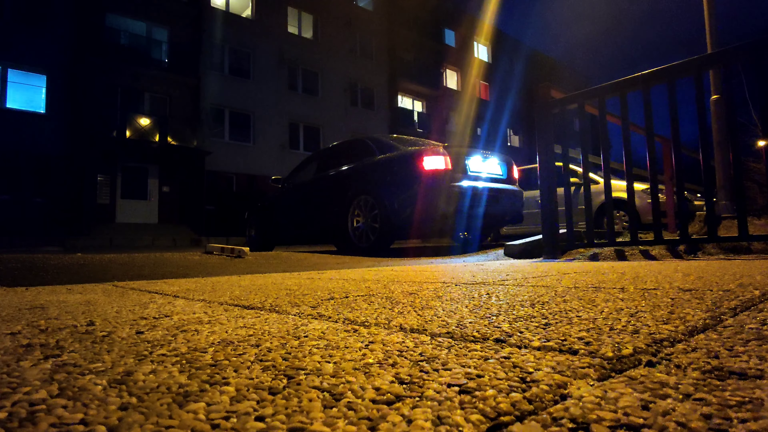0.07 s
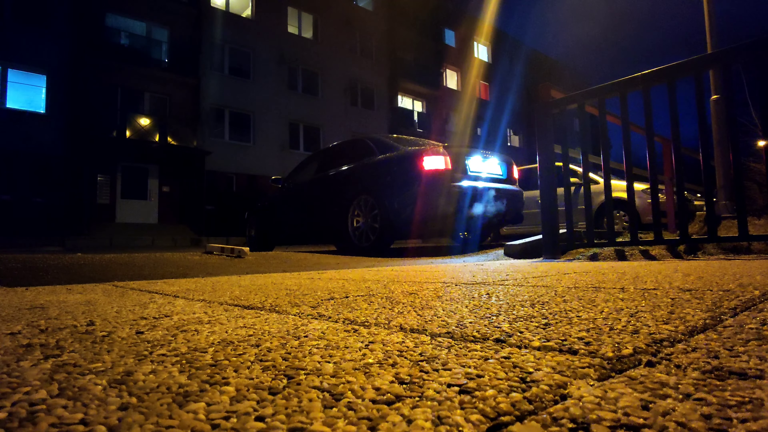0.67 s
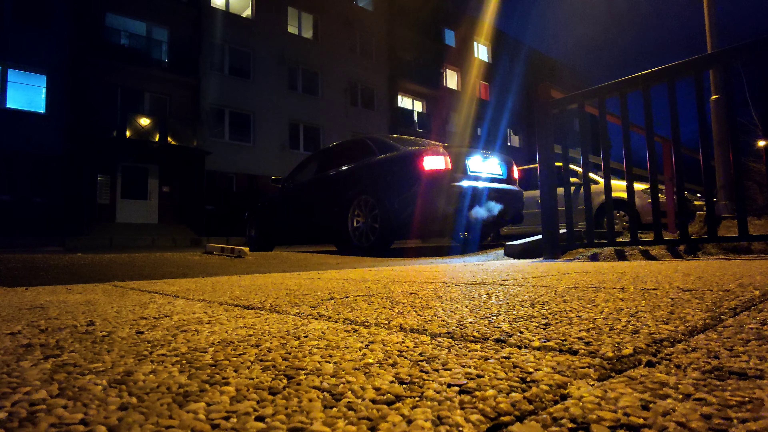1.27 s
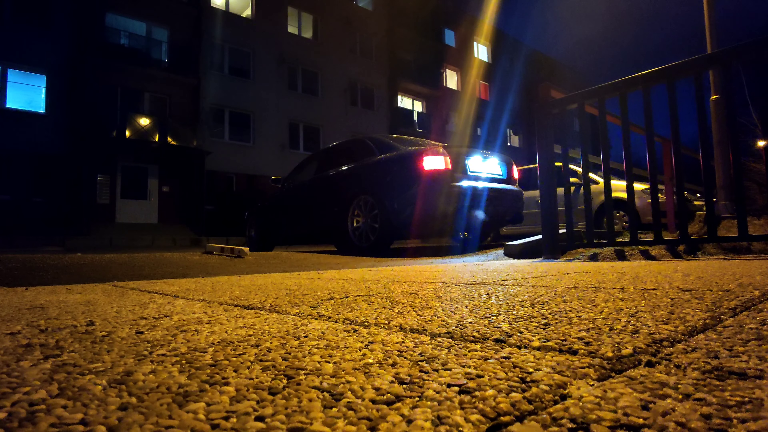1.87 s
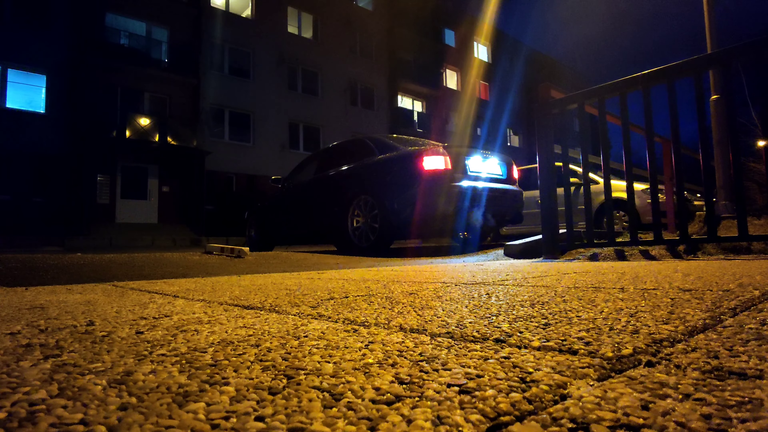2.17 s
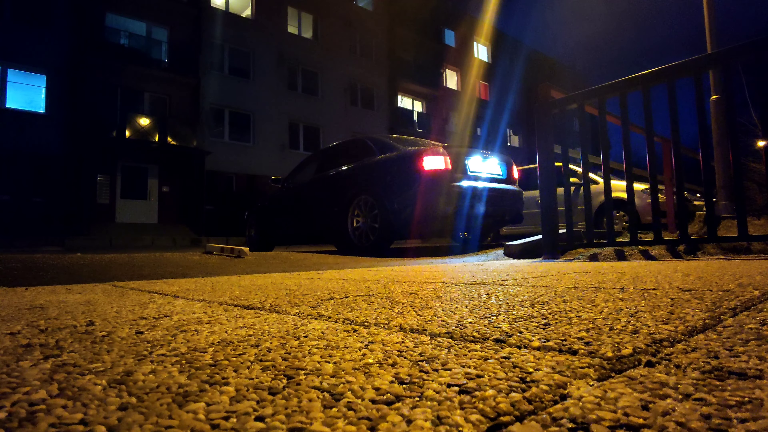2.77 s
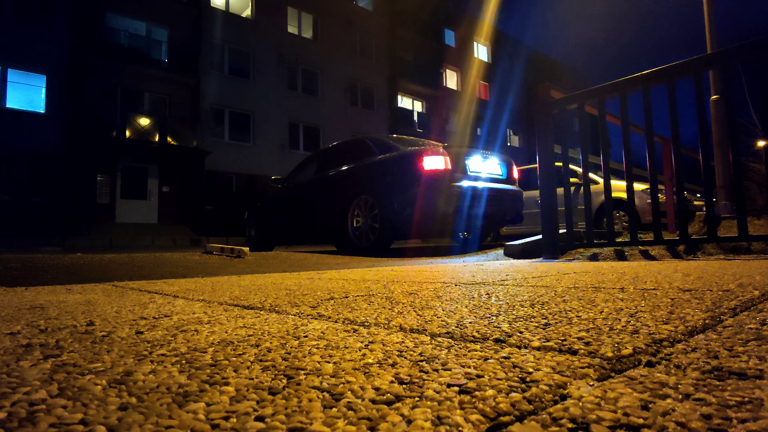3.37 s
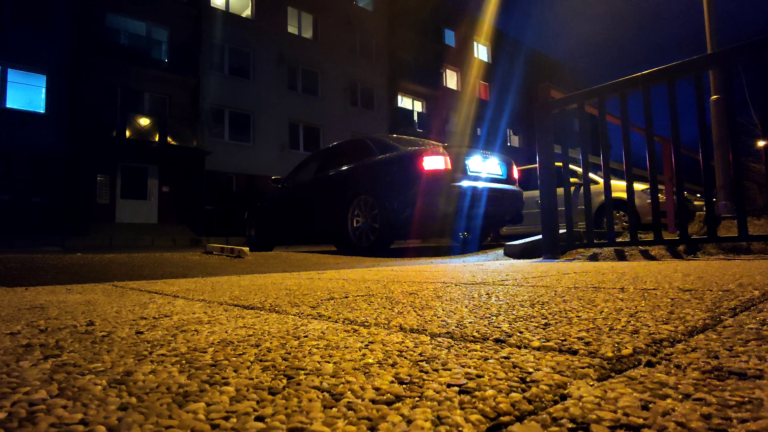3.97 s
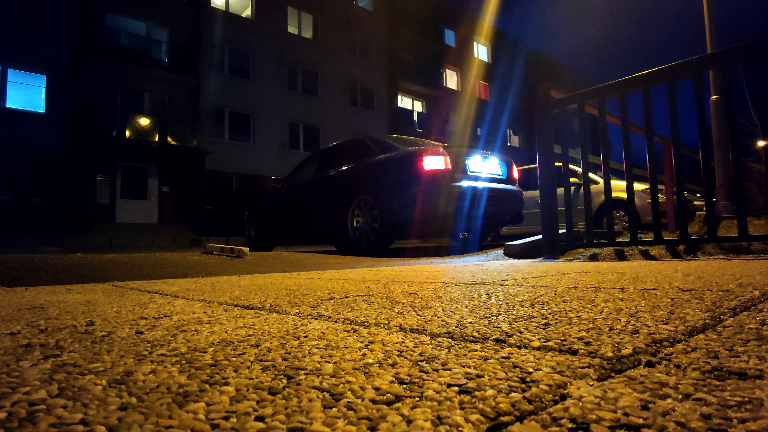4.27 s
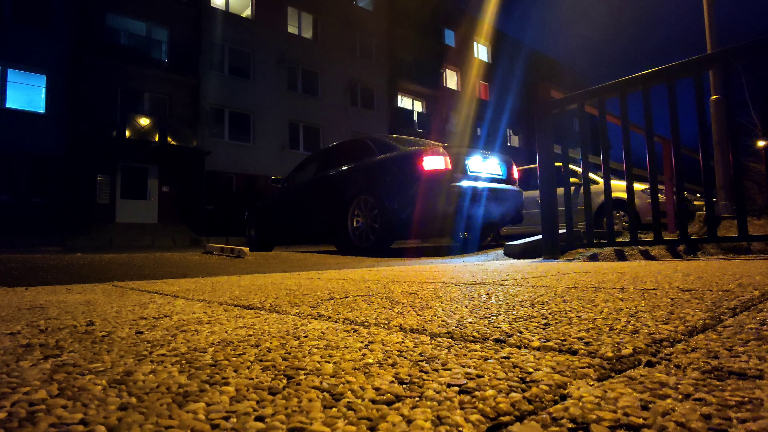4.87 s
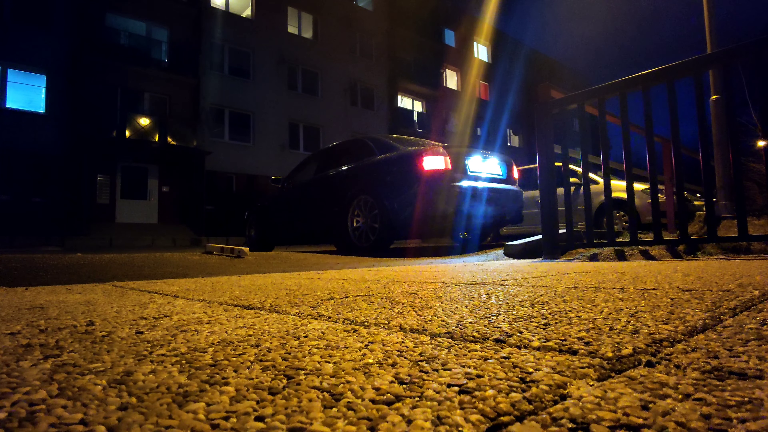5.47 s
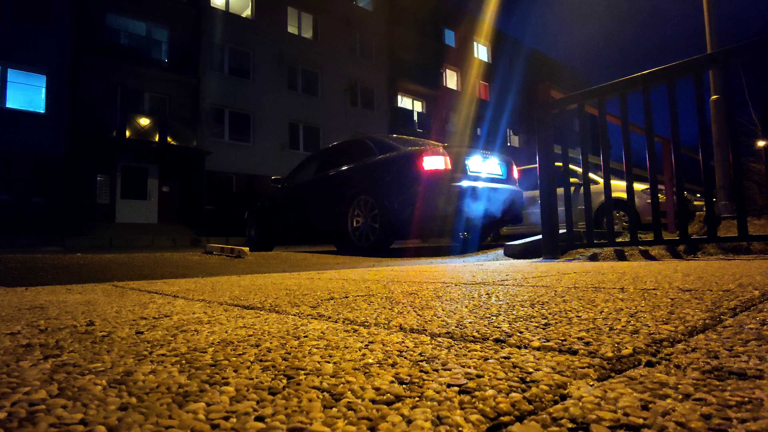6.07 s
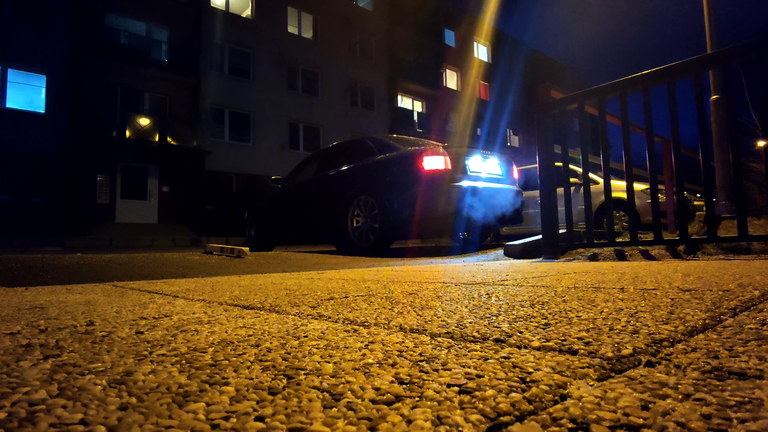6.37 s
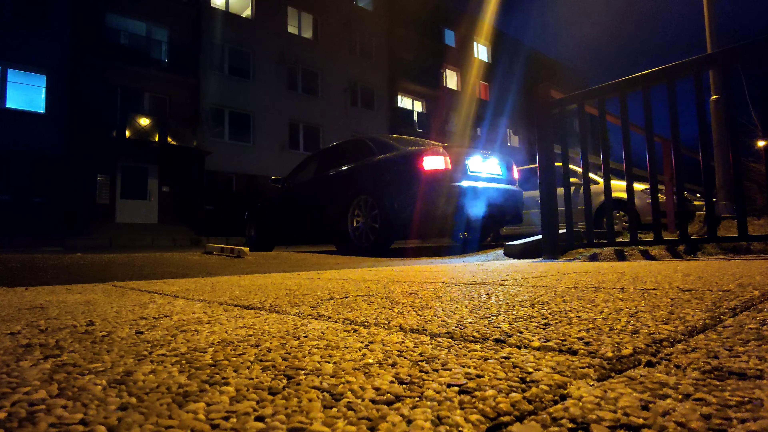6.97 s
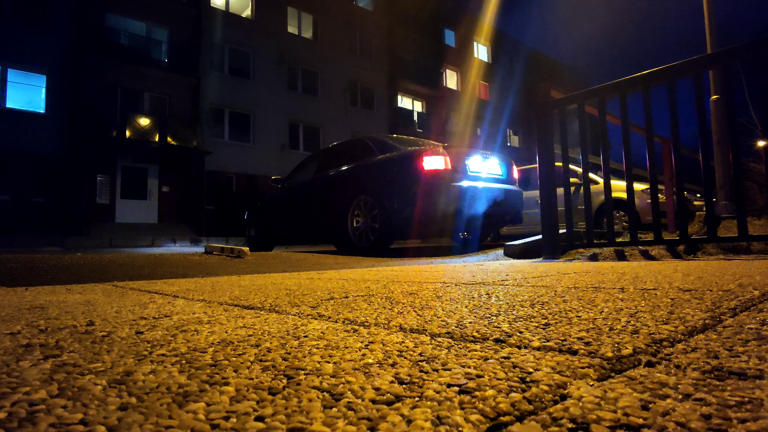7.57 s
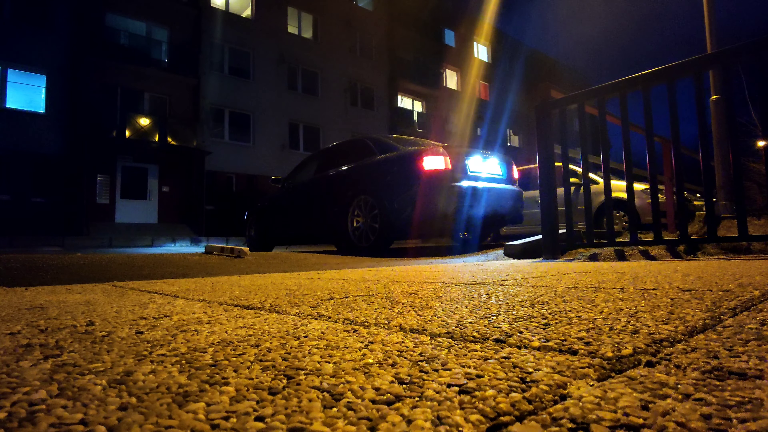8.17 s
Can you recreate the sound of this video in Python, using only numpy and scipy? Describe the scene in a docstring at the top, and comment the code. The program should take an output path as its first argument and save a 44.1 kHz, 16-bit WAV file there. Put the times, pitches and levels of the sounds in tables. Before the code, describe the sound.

Outdoors between buildings, a car engine chugs at a steady idle, with soft ticking and one faint, brief belt squeak early on. Then come two quick, loud revs that rasp through the sports exhaust, each trailed by crackling pops and sharp bangs echoing off the walls. The engine winds down to idle again. Light gusts of air rumble on the microphone.

```python
"""A six-cylinder car with a sports exhaust idles between apartment blocks at night. Each firing sends
a pressure pulse and gas noise down the pipe; house fronts echo, valves tick, air buffets the microphones.
Near 0.9 s the belt squeaks faintly. At 4.4 s and 5.6 s the engine is revved and the pipe barks and rasps.
As the throttle shuts, firing turns uneven and late-burning fuel pops in the silencer and bangs in the
pipe. From about 7 s the engine settles back to idle."""
import sys
import numpy as np
from scipy import signal
from scipy.fft import rfft, irfft
from scipy.io import wavfile
from scipy.ndimage import uniform_filter1d

SR = 44100
rng = np.random.default_rng(int(sys.argv[2]) if len(sys.argv) > 2 else 0)


def unload_wav(signal):
    """Save mono or channel-first audio to the path in sys.argv[1] as 16-bit WAV at rate SR, clipped to [-1, 1]."""
    wavfile.write(
        sys.argv[1],
        SR,
        np.round(np.clip(np.atleast_2d(signal).T, -1, 1) * 32767).astype(np.int16),
    )


N = 362943
TIME = np.arange(N) / SR
IDLE_HZ = 60  # firings a second


# (time [s], firing rate [Hz])
FIRING_RATE = [(0, 83), (.3, 74), (.55, 66), (.9, 60.7), (1.4, 59.9), (3, 60.8), (4.32, 59.7), (4.45, 72),
               (4.52, 94), (4.61, 118), (4.72, 145), (4.81, 153), (4.98, 138), (5.12, 122), (5.6, 77),
               (5.68, 96), (5.78, 128), (5.85, 158), (5.92, 183), (6.02, 199.5), (6.12, 189), (6.3, 165),
               (6.58, 129), (7.2, 80), (7.75, 63), (8.23, 57.8)]

def crankshaft(start_cycles=-.47):
    """Firing rate and its slightly wandering phase, one cycle per firing."""
    rate_hz, = curve(FIRING_RATE)
    return rate_hz, start_cycles + np.cumsum(rate_hz) / SR + .007 * wander(2)


# (opens [s], ramp [s], starts to shut [s])
THROTTLE_PRESSES = [(4.42, 0.18, 4.69), (5.615, 0.135, 5.835), (5.8, 0.115, 6.03)]

def throttle(manifold_s=.12):
    """Opening, 0-1: ramp, hold, then decay as the manifold empties."""
    presses = [np.clip((TIME - opens) / ramp, 0, 1) * np.exp(-np.maximum(TIME - shuts, 0) / manifold_s)
               for opens, ramp, shuts in THROTTLE_PRESSES]
    return np.max(presses, 0)


# Fuel cuts in (-) or starves (+): (time [s], half length [s], starvation change [ratio])
FUEL_SPELLS = [(5.051, 0.017, -0.54), (6.653, 0.063, -0.94), (7.202, 0.16, 0.83)]

def starvation(rate_hz, coast_span_hz=7.1):
    """Lack of fuel: about 1 while the engine coasts down from above idle."""
    slowing = uniform_filter1d(1. * (np.gradient(rate_hz) <= 0), size=4400)
    above_idle = np.clip((rate_hz - IDLE_HZ) / coast_span_hz, 0, 1)
    spells = sum(change * np.exp(-((TIME - s) / half) ** 4) for s, half, change in FUEL_SPELLS)
    return np.maximum(slowing * above_idle ** 2 + spells, 0)


def misfiring(rate_hz, starved, opening, idle=.06, loaded=.057, coasting=.64, rough_hz=102):
    """Share of uneven combustion, 0-1: raw, and evened out below rough_hz."""
    off_load = idle + (coasting - idle) * np.minimum(starved, 1)
    misfire = off_load * (1 - opening) + loaded * opening
    return misfire, np.maximum(misfire * np.minimum(rate_hz / rough_hz, 1) ** 2, idle)


# In firing order: (idle body [dB], idle throat [dB], load strength [dB], lag [cycles], valve tick [dB])
CYLINDERS = [(-10, -3, 2.5, .03, -19), (2.5, -8, -3.5, .02, 0), (2.5, 5.5, .5, .03, -20.5),
             (1.5, 2, -3, .005, -.5), (-3.5, -2.5, 1, .03, -6.5), (1, .5, -1, .02, -5)]

def firings(cycles, rate_hz, load, uneven, scatter_db=5, jitter_cycles=.17, bank_lag_cycles=.05):
    """Body, throat and valve impulses. Unequal cylinders chug at idle; at speed one bank lags."""
    at = np.flatnonzero(np.diff(np.floor(np.maximum(cycles, 0)))) + 1
    count = np.arange(len(at))
    body_db, throat_db, load_db, idle_lag, tick_db = np.array(CYLINDERS)[count % len(CYLINDERS)].T
    strength, slip, knock = np.clip(rng.standard_normal((len(at), 3)), -2, 2).T
    working = np.clip(np.maximum(load[at], rate_hz[at] / IDLE_HZ - 1), 0, 1)
    lag = (1 - working) * idle_lag + working * bank_lag_cycles * (count % 2)
    times_s = TIME[at] + (lag + jitter_cycles * slip * uneven[at] ** 1.5) / rate_hz[at]
    shared_db = load_db * working + scatter_db * strength * uneven[at]
    body, throat = [clicks(times_s, amp(db * (1 - working) + shared_db)) for db in (body_db, throat_db)]
    return body, throat, clicks(TIME[at], amp(tick_db + 2 * knock))


# (frequency [Hz], gain [dB])
LOAD_PULSE_SPECTRUM = [(40, -25.5), (75, -12.5), (115, 6.5), (200, 4.5), (260, -2), (315, 6.5), (388, 5),
                       (445, 4), (520, 9), (620, 8), (700, 0.5), (790, -9), (950, -8), (1250, -18.5),
                       (2500, -26), (7000, -62)]
# Standing waves: (frequency [Hz], t60 [s], gain [dB])
PIPE_MODES = [(81, .25, 4), (135, .12, 2), (182, .25, 1), (331, .45, 1), (587, .25, -5), (873, .25, 5)]
# Blare of the pipe mouth: (frequency [Hz], t60 [s], gain [dB])
MOUTH_MODES = [(700, .022, 8), (790, .02, 4), (885, .03, 2)]

def bark(pulses, soft, load, blare, bark_db, trim_db=2.4, flow_damping=.12):
    """Exhaust pulses turn hard and turbulent under load; fast flow damps the standing waves."""
    gas = steadied(pulses[None], size=8001)
    eddies = .28 * steadied(convolve(pulses, np.exp(-TIME[:1000] / .002))) * rng.standard_normal(N)
    hard = silencer(convolve(gas + eddies, response(LOAD_PULSE_SPECTRUM)), hold_hz=587, width_hz=550)
    sound = (1 - load) * soft + load * hard + ring(hard * blare, MOUTH_MODES)
    sound = yard(sound + ring(sound * (1 - flow_damping * load), PIPE_MODES), wall_db=-13, tail_db=-17)
    mids = signal.sosfilt(signal.butter(2, [280, 1000], "band", fs=SR, output="sos"), sound)
    mid_power = uniform_filter1d(uniform_filter1d((mids ** 2).mean(0), size=4400), size=2000)
    return amp(bark_db + trim_db) * sound / np.sqrt(abs(mid_power) + 1e-12)


# (time [s], half length [s], level change [dB])
BARK_SURGES = [(4.72, 0.027, -2), (4.945, 0.022, -5.5), (5.585, 0.017, -1.5), (5.665, 0.013, -5.5),
               (5.96, 0.026, 3), (6.095, 0.032, 3.5), (6.145, 0.062, 0), (6.335, 0.024, -9.5),
               (6.5, 0.028, -2), (6.62, 0.09, -6), (6.735, .02, -6)]

def bark_level(rate_hz, starved, opening, dip_db=-4, lead_s=.011, half_s=.009):
    """Level in dB: combustion catches and sags, and a firing fails just before each pop and bang."""
    base_db = level(rate_hz, starved, opening ** .72, idle_db=-37, coast_db=-4.5, octave_db=11,
                    full_db=-17.5)
    missed_db = swells([(s - lead_s, half_s, dip_db) for s, *_ in POPS + BANGS]).clip(dip_db, 0)
    burning_db = afterburn(base_db, burn_db=-11, burn_s=.013)
    return burning_db + swells(BARK_SURGES) + missed_db * (1 - opening / 2)


# (frequency [Hz], gain [dB])
IDLE_PULSE_SPECTRUM = [(40, -6), (90, 0), (150, 20), (205, -4.5), (260, 8), (300, 7), (360, 7), (410, -6),
                       (500, 5), (630, 4), (720, -6.5), (820, -38.5), (920, -19), (1200, -39.5),
                       (2500, -53.5)]
# (time [s], level [dB])
THROAT_LEVEL = [(0, -5), (1.2, -0.5), (3.5, -7.5), (6, -2), (8.2, -4)]

def putter(body, throat, split_hz=450, return_s=.0076, return_db=-11):
    """Soft off-load pulses, low body plus throaty top, return once inverted from the pipe's end."""
    churn = .08 * rng.standard_normal(N)
    lowpass, highpass = [signal.butter(2, split_hz, k, fs=SR, output="sos") for k in ("low", "high")]
    low = signal.sosfiltfilt(lowpass, steadied(body[None], size=8001) + churn)
    high = signal.sosfiltfilt(highpass, steadied(throat[None], size=8001) + churn)
    throat_db, = curve(THROAT_LEVEL)
    pulses = convolve(low + amp(throat_db) * high, response(IDLE_PULSE_SPECTRUM))
    sound = silencer(pulses, hold_hz=720, width_hz=420)
    return sound - amp(return_db) * np.roll(sound, round(return_s * SR), axis=1)


def silencer(x, hold_hz, width_hz):
    """All-pass: the chambers delay the upper mids, so each pulse chirps upward."""
    r = np.exp(-np.pi * width_hz / SR)
    poles = [1, -2 * r * np.cos(2 * np.pi * hold_hz / SR), r ** 2]
    return signal.lfilter(poles[::-1], poles, x)


# (centre [Hz], width [Hz], gain [dB])
TAILPIPE_RESONANCES = [(122.4, 17.6, -4.5), (182.55, 16, -10)]
# (time [s], half length [s], level change [dB])
BOOM_SWELLS = [(4.66, .05, 6), (4.88, 0.02, 6), (5.07, .08, 14), (5.8, 0.034, 11.5), (6.65, 0.05, 6.5),
               (7.15, 0.19, -9.5), (7.8, .2, 3.5)]

def drone(cycles, rate_hz, uneven, starved, opening, bank_db=-3, flutter=8):
    """Low firing harmonics; whichever passes a tailpipe resonance booms."""
    boom_db = level(rate_hz, starved, opening ** 12, idle_db=-20, coast_db=-7, octave_db=-6.5,
                    full_db=-19)
    low_db = level(rate_hz, starved, opening ** .74, idle_db=-34.5, coast_db=-3, octave_db=12.5,
                   full_db=-6.5)
    boom = 0
    for harmonic, db in enumerate([0, 0, -2], start=1):
        hz = harmonic * rate_hz
        gain = sum(amp(peak_db) / (1 + 1j * (hz ** 2 - centre ** 2) / (hz * width))
                   for centre, width, peak_db in TAILPIPE_RESONANCES)
        gain *= below(hz, 235) * (1 - below(hz, 100))
        boom = boom + amp(db) * (gain * np.exp(2j * np.pi * harmonic * cycles)).real
    fundamental = np.sin(2 * np.pi * cycles) * below(rate_hz, 98)
    banks = np.sin(np.pi * cycles) * (1 - below(rate_hz, 105)) * below(rate_hz, 180)  # banks alternate
    low = fundamental + amp(bank_db) * uneven * banks
    shake = flutter * uneven ** 2
    sway = (1 + shake * wander(91)) / np.sqrt(1 + shake ** 2)
    return np.sqrt(2) * sway * (amp(boom_db + swells(BOOM_SWELLS)) * boom + amp(low_db) * low)


# (frequency [Hz], gain [dB])
IDLE_GAS_SPECTRUM = [(530, 3.5), (900, -4.5), (976, -7.5), (1220, -10), (1710, -12), (2200, -12.5),
                     (2360, -15), (3120, -19.5), (3390, -21), (4480, -22), (5990, -24), (7300, -27.5),
                     (8690, -43.5), (14500, -56)]
# (frequency [Hz], gain [dB])
LOAD_GAS_SPECTRUM = [(530, -15.5), (900, -2), (1110, -9), (1400, -13.5), (1630, -10.5), (2780, -16.5),
                     (3120, -15), (3630, -17.5), (4970, -15.5), (7220, -17), (8590, -27), (14000, -39)]

def rush(pulses, rate_hz, starved, opening, puff_s=.024, jet_floor=.092):
    """Gas noise: steady flow at idle, a puff per firing under load."""
    base_db = level(rate_hz, starved, opening ** 1.11, idle_db=-49, coast_db=-1.5, octave_db=7,
                    full_db=-25)
    rush_db = afterburn(base_db, burn_db=-30, burn_s=.0095)
    jet_share = np.interp(rush_db, [-53, -38], [0, 1])
    puffs = steadied(convolve(pulses, np.exp(-TIME[:2000] / puff_s)))
    idle = amp(14) * convolve(stereo_noise(N), response(IDLE_GAS_SPECTRUM))
    jet = amp(2) * convolve(unit_rms(stereo_noise(N) * (puffs + jet_floor)), response(LOAD_GAS_SPECTRUM))
    sound = np.sqrt(1 - jet_share) * idle + np.sqrt(jet_share) * jet
    return yard(amp(rush_db) * sound, wall_db=-10, tail_db=-19)


# (frequency [Hz], gain [dB])
RASP_SPECTRUM = [(500, -9.5), (1100, 1), (2000, -2), (7200, 16), (9000, -16), (14000, -18)]

def rasp(exhaust, opening, gain_db=-21, crest_rms=1.5):
    """At open throttle the tallest pressure crests steepen into shocks and spit bright noise."""
    crests = np.maximum(steadied(exhaust).mean(0) - crest_rms, 0)
    spit = convolve(crests * stereo_noise(N), response(RASP_SPECTRUM))
    return yard(amp(gain_db) * opening ** 2 * spit, wall_db=-2.5, tail_db=-6)


# (time [s], crack [dB], shock [dB], sizzle re crack [dB])
BANGS = [(4.872, -18, -8, -11), (5.164, -13.5, -5.5, -18), (5.738, -15, -11, -23.5),
         (6.074, -15.5, -14.5, -22.5), (6.1709, -15, -8, -8), (6.2785, -16, -12.5, -11.5),
         (6.3655, -14.5, -6, -18), (6.431, -10, -7.5, -24.5)]
# (frequency [Hz], decay [s], level [dB])
SHOCK_MODES = [(353, 0.0072, -4.5), (547, .0026, 0.5), (860, 0.0035, -15.5)]
# (frequency [Hz], gain [dB])
CRACK_SPECTRUM = [(200, 20.5), (600, 13), (1200, 17), (2500, 11.5), (4200, 9.5), (7000, 10.5), (9000, -3),
                  (14000, -14.5)]

def bangs(rise_s=.00012, crack_s=.0014, sizzle_s=.045, slap_s=.025, trim_db=-1, slap_db=-13):
    """Fuel fires in the hot pipe: shock, crack, sizzle, then a bright slap off railing and walls."""
    times_s, crack_db, shock_db, sizzle_db = np.transpose(BANGS)
    t = TIME[:8000]
    front = 1 - np.exp(-t / rise_s)
    ringing = sum(amp(db) * np.exp(-t / decay_s) * np.sin(2 * np.pi * hz * t + np.pi / 5)
                  for hz, decay_s, db in SHOCK_MODES)
    shock = convolve(clicks(times_s, amp(shock_db)), front * ringing)
    hits = clicks(times_s, amp(crack_db + trim_db))
    crack = convolve(hits, np.exp(-t / crack_s))
    sizzle = convolve(clicks(times_s, amp(crack_db + trim_db + sizzle_db)), np.exp(-t / sizzle_s))
    blast = shock + convolve((crack + sizzle) * stereo_noise(N), response(CRACK_SPECTRUM))
    slap = convolve(hits, amp(slap_db) * np.exp(-abs(t - slap_s) / .011)) * stereo_noise(N)
    slap_hz_db = [(500, 12.5), (4000, -18), (6000, 5), (7400, 6), (9000, -19), (14000, -24.5)]
    return yard(blast + convolve(slap, response(slap_hz_db)), wall_db=-7, tail_db=-6)


# (time [s], level [dB])
POPS = [(4.499, -11.5), (4.563, -8.5), (4.781, -15), (4.817, -10), (4.851, -8), (4.864, -4.5), (4.898, -9),
        (4.973, -15.5), (5.036, -15.5), (5.456, -17.5), (5.625, -18), (5.698, -5.5), (5.719, -6),
        (6.085, -13), (6.101, -17.5), (6.196, -11.5), (6.253, -7.5), (6.265, -6.5), (6.386, -11),
        (6.416, -6.5), (6.458, -10), (6.537, -6.5), (6.557, -8.5), (6.567, -15), (6.659, -21.5),
        (6.759, -23), (6.82, -19.5)]

def pops(pipe_db=-4, mouth_db=-10):
    """Late combustion thumps deep in the silencer and rings the pipe."""
    times_s, db = np.transpose(POPS)
    thump = response(LOAD_PULSE_SPECTRUM)
    thumps = convolve(clicks(times_s, amp(db)), thump / abs(thump).max())
    sound = thumps + amp(pipe_db) * ring(thumps, PIPE_MODES) + amp(mouth_db) * ring(thumps, MOUTH_MODES)
    return yard(sound, wall_db=-11, tail_db=-12)


def afterburn(base_db, burn_db, burn_s):
    """Fuel burns on briefly after each pop, lifting a level in dB."""
    times_s, db = np.transpose(POPS)
    age = TIME[:SR] / burn_s
    burn_power = convolve(clicks(times_s, amp(db + burn_db) ** 2), age * np.exp(-age))[0]
    return 10 * np.log10(amp(base_db) ** 2 + abs(burn_power))


# Valve gear and pulleys: (frequency [Hz], t60 [s], gain [dB])
VALVE_MODES = [(1750, .05, 13), (2380, .22, 20), (2900, .04, 6), (3450, .04, 12.5), (5920, .058, -2)]

def valves(ticks, level_db=-55, tick_s=.0055):
    """Tappets of unequal strength tick and ring under the bonnet."""
    envelope = steadied(convolve(ticks, np.exp(-TIME[:3000] / tick_s)), size=12001)
    tap_hz_db = [(700, -27.5), (1600, -8.5), (3000, -10), (7200, -19), (8800, -36), (14000, -41.5)]
    taps = convolve(envelope * stereo_noise(N), response(tap_hz_db))
    return amp(level_db) * unit_rms(taps + ring(taps, VALVE_MODES))


def belt_squeak(pitch_hz=2385, level_db=-51.5):
    """The drive belt gives one brief wavering tone."""
    envelope = amp(level_db) * np.sqrt(np.interp(TIME, [.8, .86, .97, 1.02], [0, 1, 1, 0]))
    return envelope * np.sin(2 * np.pi * np.cumsum(pitch_hz + 14 * wander(80)) / SR)


# (frequency [Hz], gain [dB])
RUMBLE_SPECTRUM = [(12, -29.5), (25, 1), (42, -1.5), (60, 0), (85, 7.5), (250, -47), (2000, -100)]
# (frequency [Hz], gain [dB])
GUST_SPECTRUM = [(12, -26.5), (28, 0.5), (40, 6.5), (55, -5.5), (80, -1.5), (250, -39), (2000, -100)]
# (time [s], half length [s], level [dB])
GUSTS = [(1.14, 0.22, -31), (1.946, 0.065, -30), (5.414, 0.29, -39), (6.224, .08, -25)]

def buffeting(misfire, opening, base_db=-46, misfire_db=17, open_db=-7, left_db=4):
    """Moving air rumbles, more on the left and when the engine runs unevenly; deeper gusts pass."""
    noise = rng.standard_normal(N) + .22 * rng.standard_normal((2, N))
    rumble, gust = [steadied(convolve(noise, response(spectrum, size=32768)), size=12001)
                    for spectrum in (RUMBLE_SPECTRUM, GUST_SPECTRUM)]
    rumble_gain = amp(base_db + misfire_db * misfire + open_db * opening)
    gust_gain = swells([(s, half, amp(db)) for s, half, db in GUSTS])
    return (rumble_gain * rumble + gust_gain * gust) * amp([[left_db], [-left_db]])


# (frequency [Hz], t60 [s])
YARD_DECAY = [(100, 1), (500, 1), (2000, 1), (7000, 0.02), (14000, 0.26)]
# (delay [s], level [dB])
WALL_ECHOES = [(.0065, -4), (0.0124, -13.5), (0.03, -12), (.036, -14)]

def yard(x, wall_db, tail_db, smear_s=.0031):
    """Adds scattered echoes off the house fronts and a thin tail."""
    t = TIME[:SR]
    hz, age_s, noise = signal.stft(stereo_noise(SR), SR, nperseg=256)
    decay = amp(-60 * age_s / at_hz(YARD_DECAY, hz)[:, None])
    tail = signal.istft(noise * decay, SR, nperseg=256)[1][:, :SR] * np.minimum(t / .004, 1)
    walls = sum(amp(db) * np.exp(-abs(t - s) / smear_s) for s, db in WALL_ECHOES) * stereo_noise(SR)
    echoes = amp(wall_db) * unit_rms(walls) + amp(tail_db) * unit_rms(tail)
    return x + convolve(x, echoes / np.sqrt(SR))


# (frequency [Hz], left-right correlation [0-1])
MIC_CORRELATION = [(60, 1), (300, .8), (650, .45), (1300, .25), (3000, .3), (7000, .15)]

def stereo_noise(size):
    """Diffuse noise at two close microphones: alike in the bass, nearly unrelated in the treble."""
    a, b = rfft(rng.standard_normal((2, size)))
    same = at_hz(MIC_CORRELATION, np.fft.rfftfreq(size, 1 / SR))
    return irfft(np.array([a, same * a + np.sqrt(1 - same ** 2) * b]), size)


def level(rate_hz, starved, opening, idle_db, coast_db, octave_db, full_db):
    """Layer level in dB: follows starvation and speed off load, goes to full_db at open throttle."""
    off_load_db = idle_db + coast_db * starved + octave_db * np.log2(rate_hz / IDLE_HZ)
    return (1 - opening) * off_load_db + opening * full_db


def ring(x, modes):
    """Ringing of damped modes driven by x."""
    out = 0
    for hz, t60_s, db in modes:
        r = np.exp(-np.log(1000) / (t60_s * SR))
        pole = r * np.exp(2j * np.pi * hz / SR)
        out = out + 2 * amp(db) * signal.lfilter([1 - r], [1, -pole], x).real
    return out


def response(spectrum, size=8192):
    """Minimum-phase impulse response of unit energy."""
    log_gain = np.log(amp(at_hz(spectrum, abs(np.fft.fftfreq(size, 1 / SR)))))
    taps = np.fft.ifft(np.exp(np.conj(signal.hilbert(log_gain)))).real[:size // 2]
    return taps / np.linalg.norm(taps)


def steadied(x, size=4001):
    """Holds the slow RMS at one; single pulses keep their shape."""
    window = np.hanning(size)
    power = signal.fftconvolve((x ** 2).mean(0), window / window.sum(), "same")
    return x / np.sqrt(abs(power) + 1e-12)


def wander(cutoff_hz):
    """Low-passed noise of unit RMS."""
    hz = np.fft.rfftfreq(N, 1 / SR)
    return unit_rms(irfft(rfft(rng.standard_normal(N)) * np.exp(-(hz / cutoff_hz) ** 2), N))


def clicks(times_s, sizes):
    """One impulse at each time."""
    return np.bincount(np.clip(np.round(times_s * SR).astype(int), 0, N), sizes, N + 1)[:N]


def swells(rows):
    """Sum of bell-shaped rises and dips."""
    return sum(height * np.exp(-((TIME - s) / half_s) ** 2) for s, half_s, height in rows)


def curve(rows):
    """Table columns interpolated over time."""
    times_s, *columns = np.transpose(rows)
    return [np.interp(TIME, times_s, column) for column in columns]


def at_hz(points, hz):
    """Table interpolated over log frequency."""
    points_hz, values = np.transpose(points)
    return np.interp(np.log(hz + 1), np.log(points_hz + 1), values)


def below(hz, edge_hz):
    """Steep low-pass gain."""
    return np.exp(-(hz / edge_hz) ** 8)


def convolve(x, taps):
    return signal.fftconvolve(np.atleast_2d(x), np.atleast_2d(taps), axes=1)[:, :N]


def unit_rms(x):
    return x / np.sqrt(np.mean(x ** 2) + 1e-20)


def amp(db):
    return 10 ** (np.asarray(db) / 20)


def scene(blare_hz=165):
    """Speed and throttle drive the exhaust; pops, bangs, valves, belt and air join it."""
    rate_hz, cycles = crankshaft()
    opening = throttle()
    starved = starvation(rate_hz)
    misfire, uneven = misfiring(rate_hz, starved, opening)
    bark_db = bark_level(rate_hz, starved, opening)
    load = np.interp(bark_db, [-35, -20], [0, 1])
    blare = opening * (rate_hz / blare_hz) ** 2
    body, throat, ticks = firings(cycles, rate_hz, load, uneven)
    pipe = bark(body, putter(body, throat), load, blare, bark_db)
    exhaust = pipe + drone(cycles, rate_hz, uneven, starved, opening)
    exhaust += rasp(pipe, opening) + rush(body, rate_hz, starved, opening)
    return exhaust + pops() + bangs() + valves(ticks) + belt_squeak() + buffeting(misfire, opening)


# (frequency [Hz], left minus right [dB])
MIC_BALANCE = [(60, 2.5), (120, 1.5), (200, 1), (370, -.5), (690, -1.2), (1270, -4), (2330, 3.5), (4290, 0),
               (7890, 4), (14500, 0)]
# (frequency [Hz], left phase lead [rad])
MIC_PHASE = [(40, 0.92), (125, 0.69), (280, 0.11), (600, 0.16), (1500, 0.099)]

def record(dry, ceiling=.95, cutoff_hz=14450):
    """Two microphones differ in colour and phase; peaks round off; the top treble is cut."""
    hz = np.fft.rfftfreq(N, 1 / SR)
    left = amp(at_hz(MIC_BALANCE, hz) / 2) * np.exp(1j * at_hz(MIC_PHASE, hz) / 2)
    heard = irfft(rfft(dry) * np.array([left, 1 / left]), N)
    rounded = heard / (1 + (heard / ceiling) ** 4) ** (1 / 4)
    lowpass = signal.firwin(511, cutoff_hz, window=("kaiser", 9), fs=SR)
    return signal.oaconvolve(rounded, lowpass[None], "same")


dry = scene()
out = record(dry)
unload_wav(out)
```